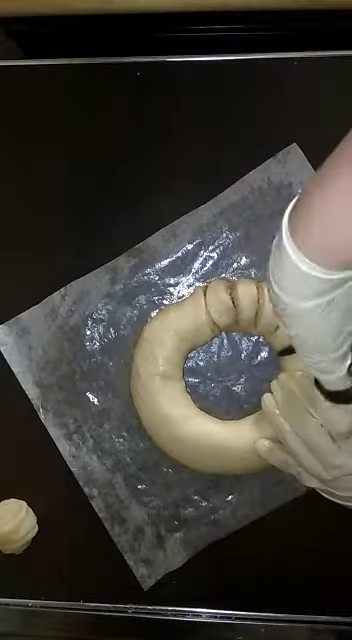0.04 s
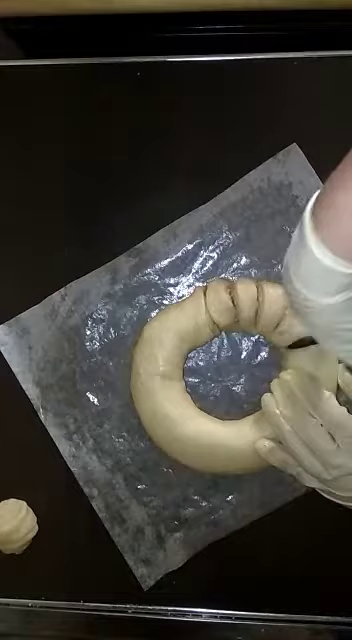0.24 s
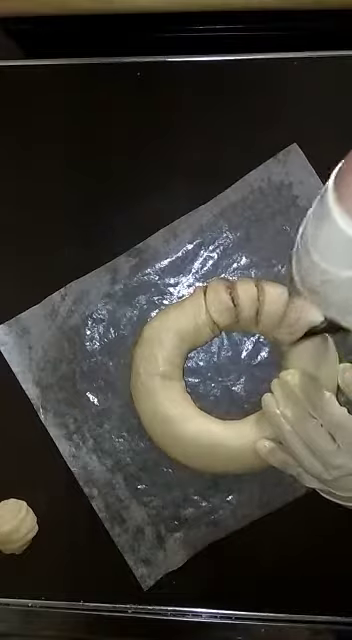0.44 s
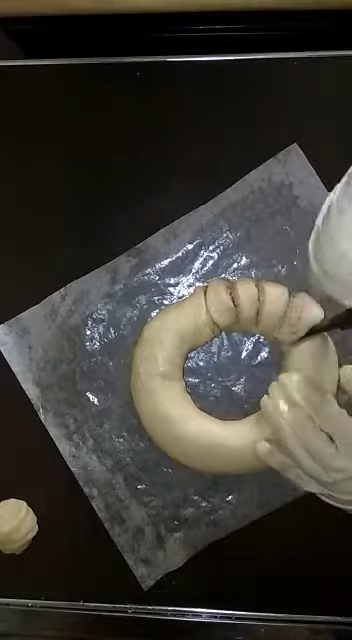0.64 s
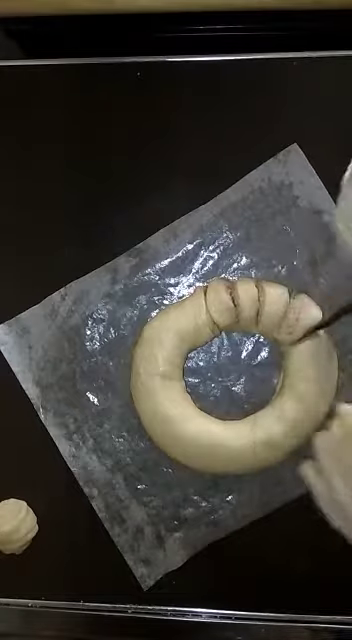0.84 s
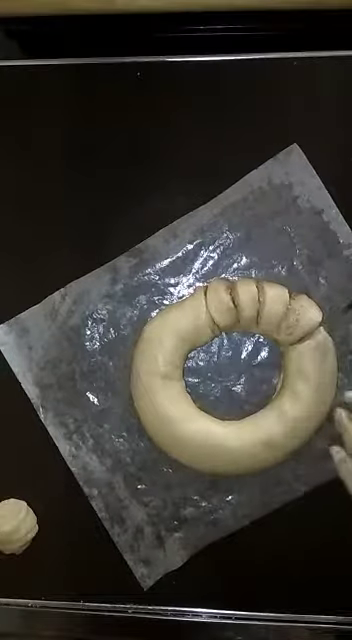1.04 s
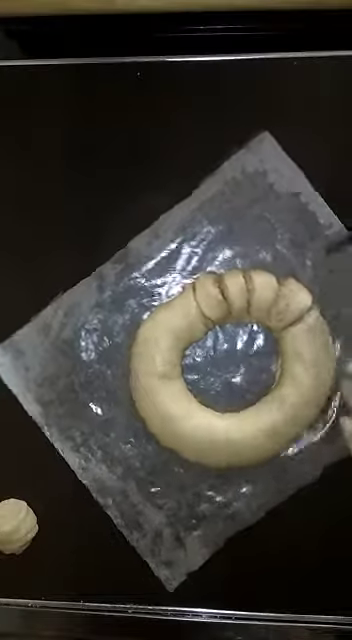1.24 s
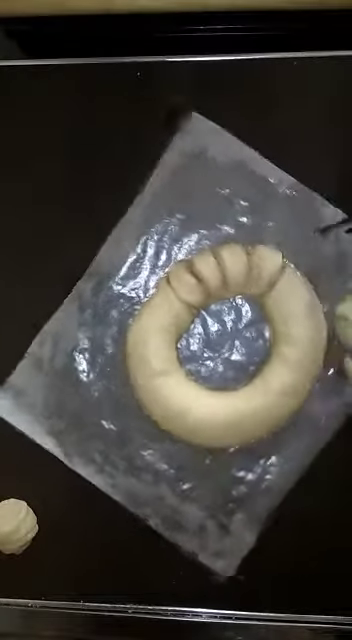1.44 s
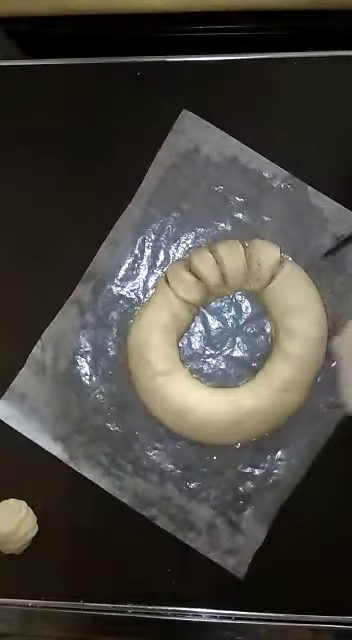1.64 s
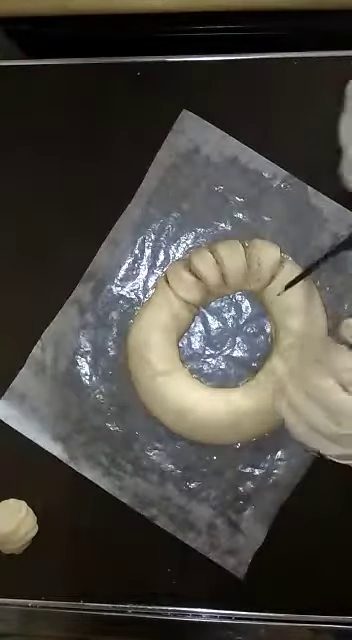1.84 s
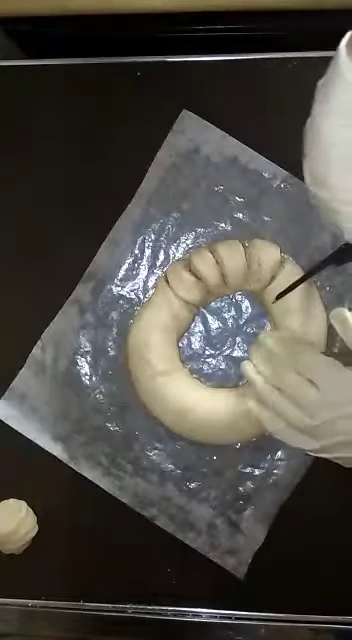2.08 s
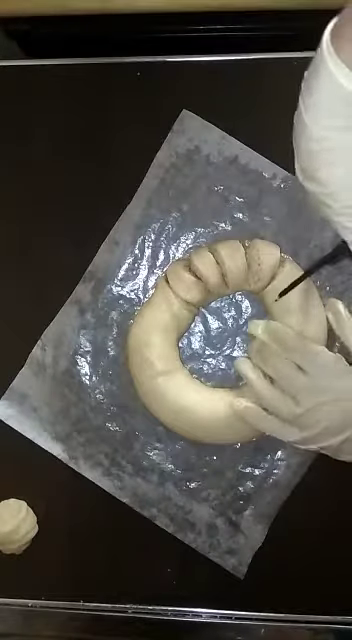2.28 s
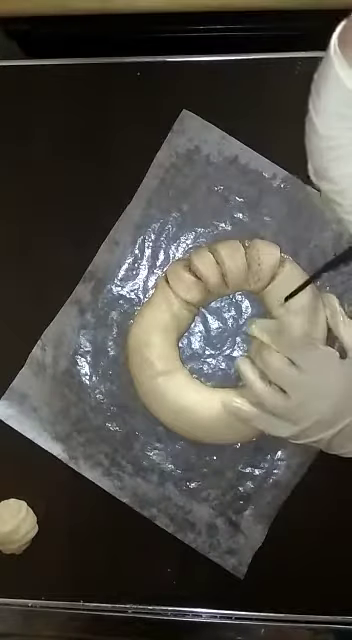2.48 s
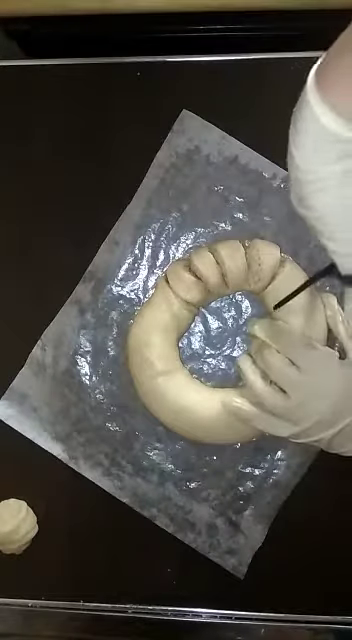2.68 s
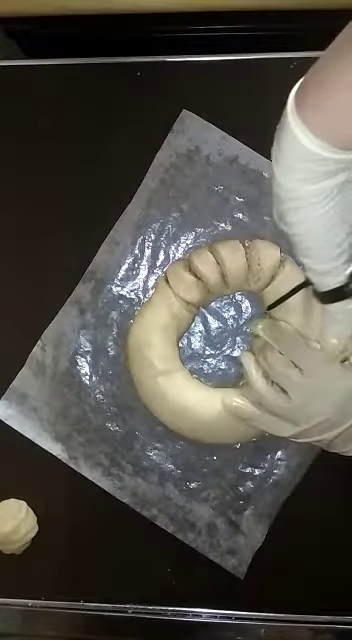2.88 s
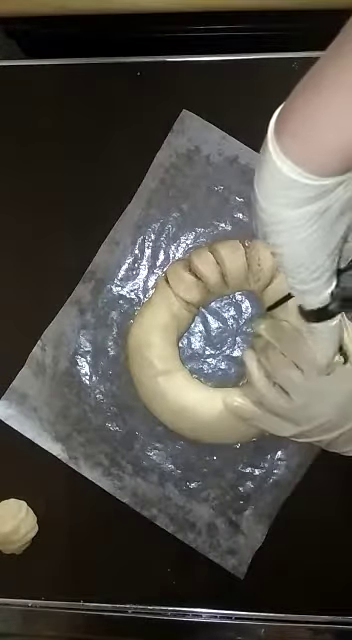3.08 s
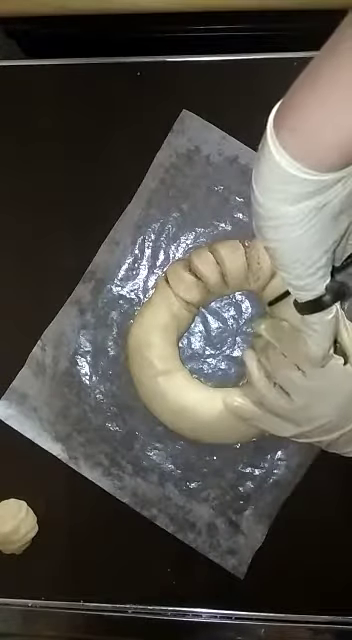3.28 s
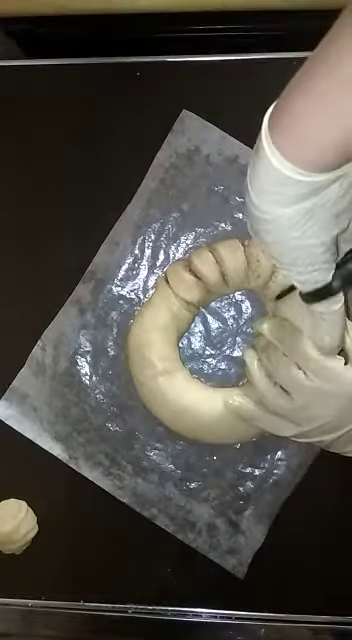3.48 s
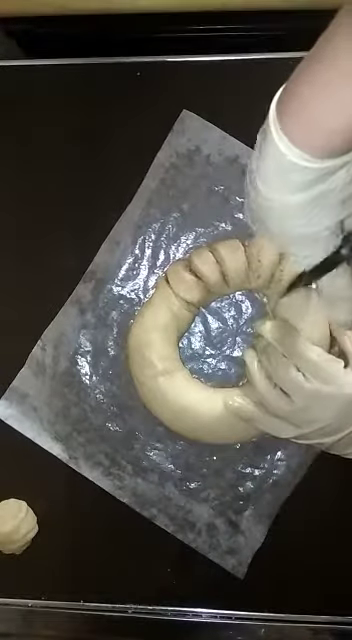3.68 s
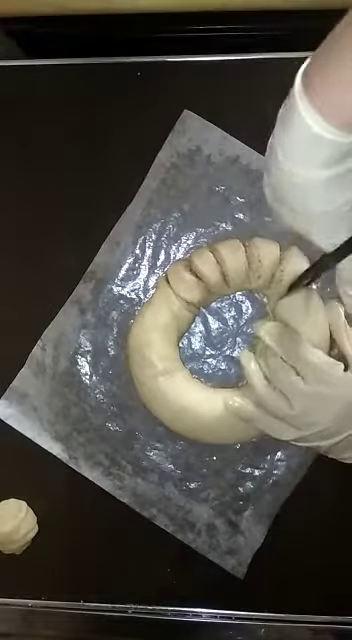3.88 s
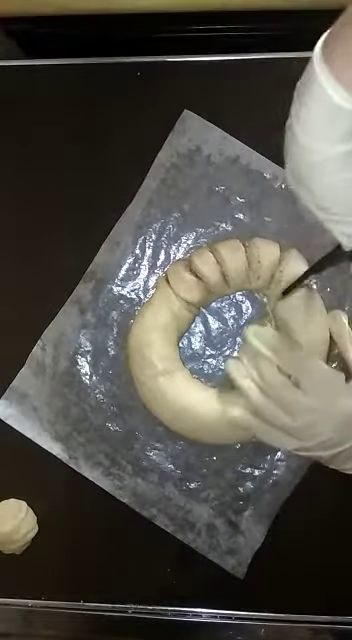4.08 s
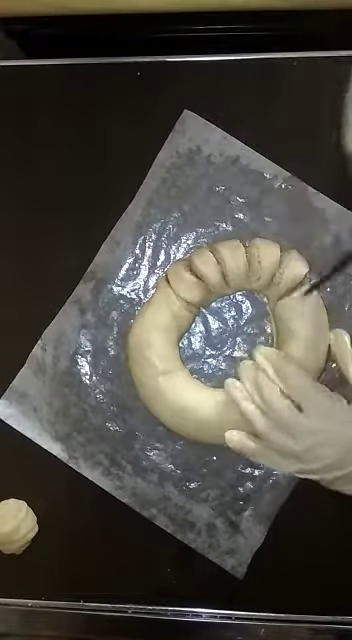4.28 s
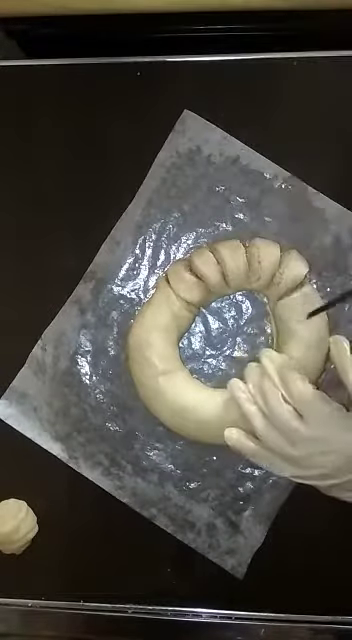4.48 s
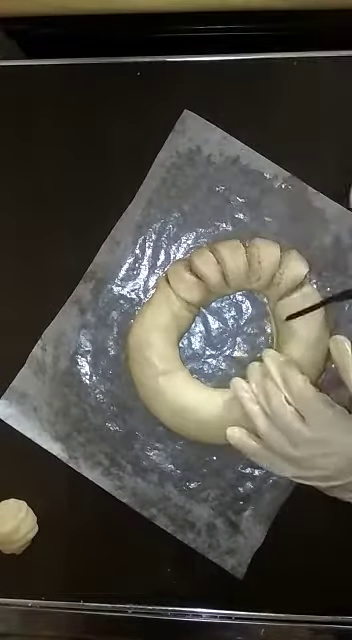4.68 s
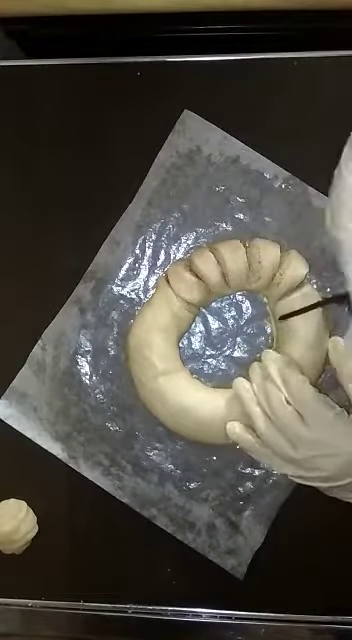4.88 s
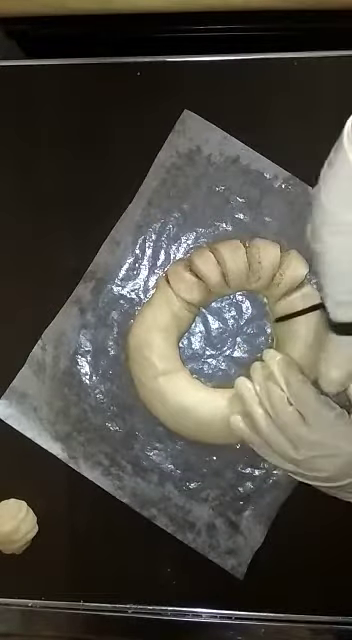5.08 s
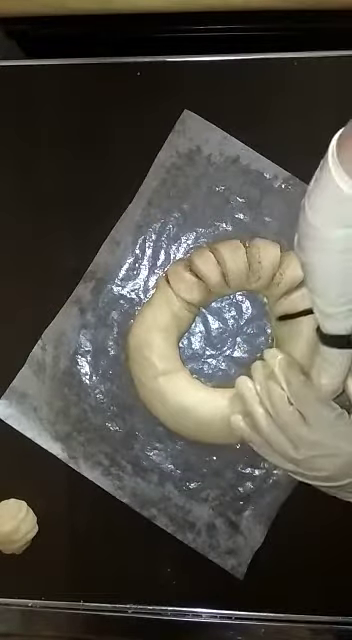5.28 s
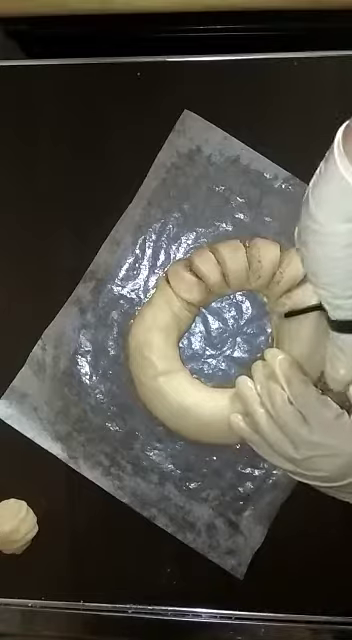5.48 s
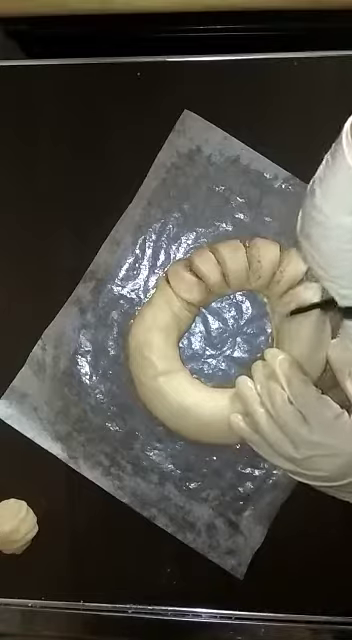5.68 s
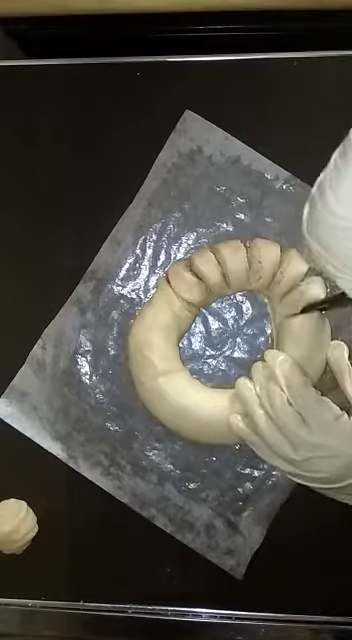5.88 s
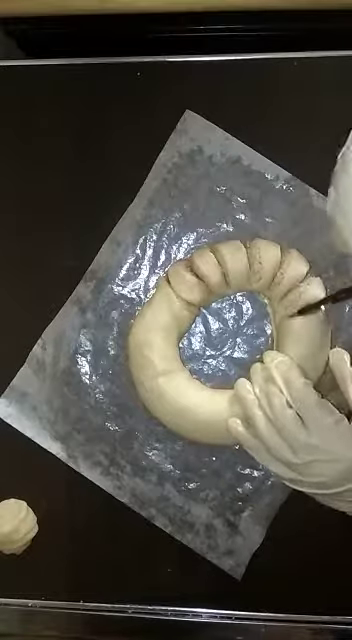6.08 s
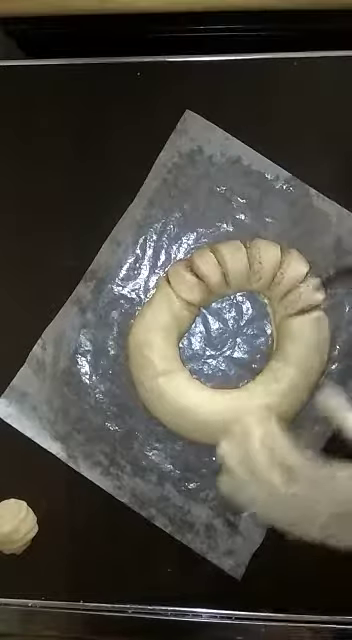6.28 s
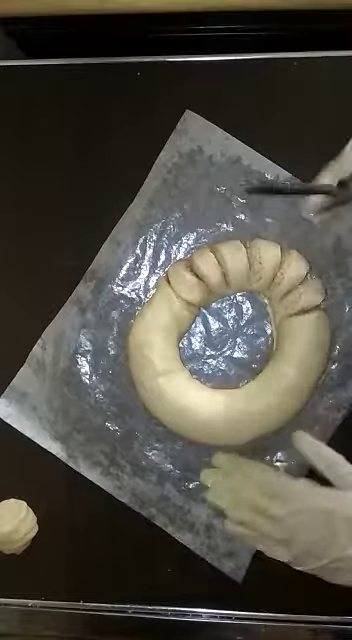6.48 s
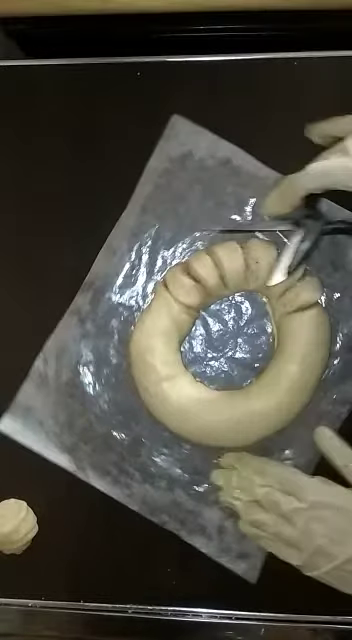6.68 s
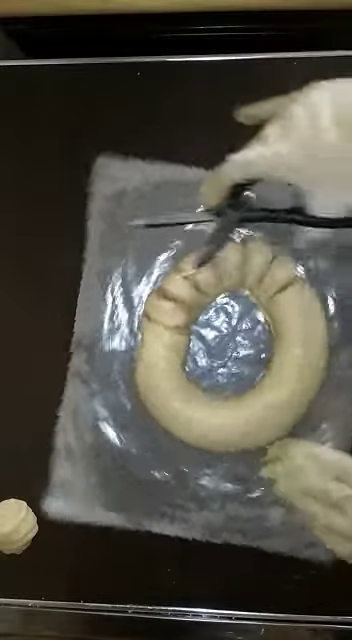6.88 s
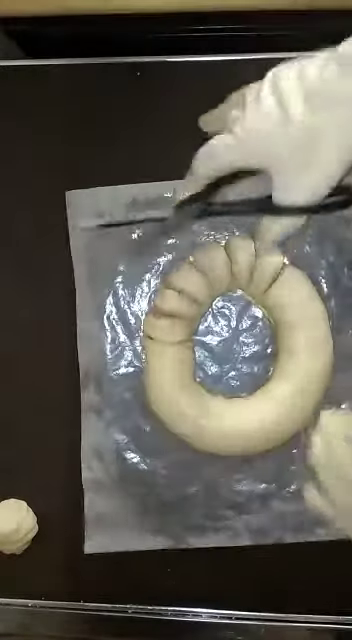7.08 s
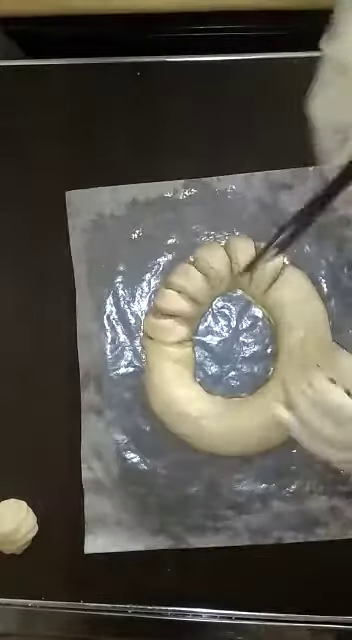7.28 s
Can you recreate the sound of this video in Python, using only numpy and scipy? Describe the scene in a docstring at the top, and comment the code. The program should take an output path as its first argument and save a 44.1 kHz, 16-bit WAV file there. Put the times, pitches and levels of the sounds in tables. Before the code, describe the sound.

In a quiet indoor room with a faint low appliance hum, scissors snap shut with a hard metallic tick and a dull thud on the worktop. Baking paper is then dragged round with bright crackling and swishing. Two more snips follow at intervals among soft glove rubbing and faint knocks, then another paper drag ends in a sharp snap. Close stereo microphones above, with a short room echo.

```python
"""Kitchen scissors snip a ring of dough on baking paper: hard ticks ring the steel's resonances.
Thuds, faint low knocks and leaning hands sound as modes of the hard worktop beneath. Between snips gloved
hands drag the paper round: gritty noise makes the hiss, short snaps, slower rubbing swells and dull bursts,
and gliding tones the squeaks. An appliance hums as tones and narrow noise bands in a quiet room with air
noise and a short diffuse echo; two microphone ports hear it from above."""
import sys
import numpy as np
from scipy import signal
from scipy.fft import rfft, irfft
from scipy.io import wavfile
from scipy.ndimage import uniform_filter1d

SR = 44100
rng = np.random.default_rng(int(sys.argv[2]) if len(sys.argv) > 2 else 0)


def pcm_store(signal):
    """Save signal as 16-bit PCM."""
    levels = np.round(np.clip(np.atleast_2d(signal), -1, 1) * 32767)
    wavfile.write(sys.argv[1], SR, levels.astype(np.int16).T)


N = 323253  # length in samples

# room air and microphone hiss, relative spectrum: f/Hz, level/dB
AIR_SPECTRUM = [(8, -2.5), (30, -7.5), (50, -3), (75, -33), (125, -10.5), (185, -11), (230, -32),
                (310, -17.5), (420, -23), (660, -29.5), (950, -39.5), (3000, -50.5), (6900, -50.5),
                (11000, -36.5), (16000, -50.5)]
AIR_DB = -58  # rms
# likeness of the steady sound in the two ports, clipped to -1..1: f/Hz, correlation/1
STEADY_LIKENESS = [(60, 0.91), (250, 0.86), (640, -0.017), (1400, -1.2), (3000, -1.1), (6000, 0.015)]
# appliance tones: f/Hz, width of each of two resonances/Hz, noise level/dB, steady level/dB (both rms)
HUM_TONES = [(49.4, 3.3, -63.5, -60), (98.7, 2.2, -71, -82), (149.5, 4, -76.5, -69.5),
             (173.7, 2.7, -65.5, -65), (343.5, 18.2, -69, -102), (755, 3.3, -84.5, -93.5),
             (1062.5, 46, -80, -99), (8870, 100, -83, -99)]
FAN_HZ, FAN_DB, FAN_WANDER_HZ = 343.7, -71, 3.5  # mean pitch, rms level, rms pitch wander
SWAY_DB = -52.5  # rms of the slow pressure sway near 10 Hz
# reverberation of the room: f/Hz, t60/s
ROOM_DECAY = [(300, 0.56), (2000, 0.27), (8000, 0.22), (15000, 0.24)]
# likeness of worktop sounds in the two ports, clipped to -0.9..1: f/Hz, correlation/1
NEAR_LIKENESS = [(250, 0.9), (500, 0.41), (1000, 0.057), (2500, 0.17), (6000, 0)]

# gloved hands moving over dough and paper: t/s, hiss level before colouring/dB
GLOVE_RUBBING = [(0, -84.5), (.16, -70.5), (.33, -99), (.48, -61), (.65, -74), (.75, -64.5), (.95, -66.5),
                 (1.7, -65), (2.02, -73), (2.16, -66.5), (2.5, -71), (2.65, -76.5), (3.5, -75),
                 (3.78, -62.5), (3.9, -73.5), (4.05, -63), (4.22, -70.5), (4.45, -73.5), (4.55, -75),
                 (5.3, -75.5), (5.35, -65.5), (5.4, -63), (5.46, -71), (5.51, -72), (5.54, -75),
                 (5.76, -71), (5.92, -65.5), (6.04, -74), (6.11, -62), (6.27, -73), (7.33, -65.5)]
# the sheet dragged round, one list for each of two drags: t/s, hiss level before colouring/dB
SHEET_SLIDES = [
    [(1.06, -67), (1.1, -53), (1.17, -55), (1.22, -43.5), (1.35, -39), (1.42, -36), (1.53, -39.5),
     (1.6, -47), (1.64, -58.5), (1.72, -91)],
    [(6.3, -73), (6.38, -66), (6.48, -59.5), (6.53, -47), (6.63, -55.5), (6.7, -58), (6.74, -38.5),
     (6.84, -40.5), (6.88, -39), (6.97, -36), (7.05, -43), (7.09, -47.5), (7.15, -61.5), (7.24, -66)],
]
# rubbing at QUIET_DB has this tilt (dB per octave); each dB above it brightens the hiss
QUIET_DB, QUIET_TILT_DB, TILT_PER_DB = -64, -2.5, 0.1775
# dull mid-range noise bursts, scuffs and the body of thuds: t/s, rms level at full swell/dB, rise/s, t60/s
DULL_BURSTS = [(.515, -39.5, 0.0011, 0.13), (0.837, -52.5, 0.027, 0.2), (3.734, -34.5, 0.0026, 0.058),
               (5.226, -66, 0.0048, .15), (5.813, -36.5, 0.0013, 0.015), (4.88, -58.5, 0.023, 0.16),
               (5.39, -58, 0.049, 0.29), (6.501, -61, 0.013, 0.65), (6.8, -61, 0.084, 0.4),
               (1.125, -52, 0.0049, .08), (1.4, -65, 0.027, 0.22), (1.51, -55.5, 0.013, 0.19),
               (6.93, -56.5, 0.039, 0.24)]
# relative spectrum of the dull bursts: f/Hz, level/dB
DULL_SPECTRUM = [(150, 7), (300, 4.5), (700, 11.5), (1100, -0.5), (1600, 2), (2500, -6), (4000, -15),
                 (8000, -19)]
# faint glove squeaks: t/s, length/s, starting f/Hz, final f/Hz, peak level before the ports/dB
GLOVE_SQUEAKS = [(0.264, 0.023, 1850, 1720, -67.5), (1.597, .005, 6160, 6100, -41),
                 (1.625, .005, 6160, 6050, -53), (1.655, 0.004, 6040, 5970, -47),
                 (1.952, 0.049, 2360, 2560, -69), (3.566, 0.014, 1500, 1600, -67),
                 (3.663, 0.028, 1350, 1500, -69)]
# relative spectrum of the paper noise: f/Hz, level/dB
PAPER_SPECTRUM = [(530, -48), (900, -51), (1340, -17.5), (1460, -17.5), (2250, -9.5), (3380, -8.5),
                  (4100, -5), (4600, -7.5), (4950, -9), (5300, -7), (5890, -4), (6500, -6.5), (6850, -10),
                  (7300, -5.5), (9000, -5), (11000, -0.5), (12500, -2.5), (14400, -11.5), (16000, -19.5)]
# short paper and glove sounds, sharp snaps and slower rubbing swells:
# t/s, peak level before the ports/dB, rise/s, t60/s, tilt/(dB per octave)
SNAPS_AND_SWELLS = [(.550, -40.5, 0.0033, 0.055, -1), (0.725, -49, 0.017, 0.12, -4),
                    (1.113, -30, 0.0015, 0.076, -1), (1.118, -22.5, 0.018, 0.045, 0.5),
                    (1.179, -29.5, 0.0038, 0.039, 1), (1.205, -32, .005, 0.085, 3),
                    (1.211, -31, 0.0054, 0.086, 1.5), (1.321, -21, 0.0016, 0.039, 1),
                    (1.364, -31, 0.0036, 0.043, -5), (1.4109, -14.5, 0.0016, 0.05, -0.7),
                    (1.417, -25, 0.0051, 0.13, -2.5), (1.513, -19, .0015, 0.023, 1.5),
                    (1.517, -19, .003, 0.039, 0), (1.568, -35, .0022, 0.035, -3),
                    (1.586, -27.5, 0.0023, 0.054, -0.5), (1.599, -27.5, 0.0026, 0.029, 16),
                    (1.651, -45.5, .0018, .04, -5), (2.164, -51.5, 0.0085, 0.14, -5),
                    (3.02, -51, 0.009, 0.12, 9), (3.38, -50.5, .0028, 0.041, 11),
                    (3.648, -48, 0.015, 0.48, 6), (5.167, -55, 0.0012, 0.027, -8.5),
                    (5.209, -44, 0.0039, .06, -1.5), (5.221, -43, .0042, 0.07, 0),
                    (5.364, -34.5, 0.004, 0.03, 2), (5.3794, -27.5, 0.0016, 0.045, 1),
                    (5.393, -40, .002, 0.027, -1.5), (5.429, -28, 0.0036, 0.03, 1.5),
                    (5.47, -31.5, 0.0015, 0.046, 0), (5.8113, -33, 0.0024, 0.037, 5),
                    (6.088, -39.5, 0.0011, 0.028, -7), (6.193, -48.5, 0.01, 0.15, -5),
                    (6.498, -32.5, 0.0014, 0.053, -5), (6.525, -36.5, 0.002, 0.084, -15.5),
                    (6.529, -26, 0.0027, 0.059, 4.5), (6.559, -38, 0.0034, 0.056, -8.5),
                    (6.585, -41, .003, .04, -10), (6.630, -33, 0.0013, 0.041, -0.5),
                    (6.645, -46.5, 0.0015, 0.026, -17), (6.718, -24, 0.0079, 0.13, 4),
                    (6.722, -18.5, 0.024, 0.042, 2.5), (6.859, -38, 0.0036, 0.085, -3.5),
                    (7.0624, -11, 0.0018, 0.021, 2.5), (7.067, -21, 0.0022, .04, 6),
                    (7.077, -28, .002, .03, 10)]

# hands leaning on the dough, a rumble in the slab: start t/s, length/s, level before the high-pass/dB
HAND_LEANS = [(0.104, 0.29, -56.5), (1.374, 0.25, -68), (3.433, 0.29, -64), (5.375, 0.17, -54.5),
              (6.497, 0.074, -70), (6.737, 0.42, -57)]
# worktop mode pitches: f/Hz
MODE_HZ = [121, 153, 181, 204, 306, 349, 387, 430, 467, 560, 596, 617, 701, 795, 915, 1230, 1400]
# the same modes in order: relative level/dB, t60/s (thuds and knocks use at most 0.4 s)
MODE_RING = [(-6, 0.5), (-12, 0.1), (-4.5, 0.12), (1, 0.052), (-23, 0.067), (-5.5, 0.25), (3.5, 0.11),
             (-5, 0.018), (-13, 0.14), (-3.5, 0.038), (-9.5, 0.088), (-1, 0.14), (-5.5, 0.18), (-20, 0.1),
             (-26, 0.041), (-17, 0.04), (-21, 0.01)]
MIDDLE_HZ, UPPER_HZ = 250, 520  # where the middle and upper modes begin
# thuds and faint low knocks: t/s, peak ring level before the high-pass/dB, pulse length/s,
# first swing/(+1 or -1), middle modes' level/dB, upper modes' level/dB
THUDS_AND_KNOCKS = [(0.5164, -17, 0.0044, 1, -1.5, -1.5), (0.861, -42, 0.014, -1, -2, 0),
                    (1.124, -47, 0.0035, -1, -9, -4), (1.17, -44, 0.0083, -1, -5, -3),
                    (1.385, -52, 0.0028, -1, 3, 7), (1.403, -42, 0.0026, -1, 0, 5),
                    (1.429, -45.5, 0.0042, -1, 0, -9), (1.467, -52, 0.0022, -1, -3, 9),
                    (1.497, -53, 0.0027, -1, 0, 5), (1.519, -54, 0.0023, -1, -4, 2),
                    (2.356, -52, 0.0076, -1, -12, 0), (3.474, -43.5, 0.0036, -1, 3, 1),
                    (3.516, -55, 0.0028, -1, -2, -2), (3.56, -55, 0.0057, -1, -2, 2),
                    (3.585, -42.5, 0.0058, -1, -3, 4), (3.673, -42, 0.0056, -1, 6, 6),
                    (3.725, -38.5, 0.004, 1, 2, 0), (3.7335, -22.5, 0.004, -1, -5, 0),
                    (4.887, -51, 0.0051, -1, -3, 3), (5.2250, -28.5, 0.0039, -1, 0, 2),
                    (5.26, -40, 0.0024, 1, -7, 7), (5.412, -39.5, 0.0042, -1, 2, -6),
                    (5.441, -39, 0.0034, -1, -1, -2), (5.817, -30.5, 0.0055, -1, -1, -9),
                    (6.711, -40.5, 0.0079, -1, -5, -8), (6.865, -57, .003, -1, 4, 2),
                    (6.94, -47, 0.0031, -1, 5, 0), (6.987, -50, 0.0033, -1, -1, -1)]
HARD_TILT_DB, TILT_DB_PER_MS = 7.5, -1.1  # dB per octave at zero length; longer pulses tilt downwards
RATTLE_DB = -13  # peak, against the peak of the ring
REST_DRAG_DB, DRAG_PER_DB = -73.5, 0.2619  # slab drag at QUIET_DB, and its rise per dB of rubbing

# blades shutting: t/s, click peak level/dB, t60 of the crushed-dough fizz/s, fizz level re click/dB
BLADE_SNIPS = [(.5133, -26, .03, -4), (3.7336, -24, .028, -6), (5.8150, -21, .032, -6)]
# steel resonances: f/Hz, width/Hz (at least 900 is used), relative level/dB
BLADE_MODES = [(1430, 840, -17), (3020, 14000, -26), (4350, 910, 0), (5530, 4050, 2), (7950, 420, 10),
               (10570, 480, 4.5), (13000, 400, -28)]
PORT_LAG = 6  # samples by which the left port hears the click late
EDGE_HZ = 15680  # upper band limit


def gain_of(db):
    """Level law: an amplitude factor is ten to the power of dB / 20."""
    return 10 ** (np.asarray(db) / 20)


def evened(x):
    """Normalisation: scales the mean power to 1."""
    return x / np.sqrt(np.mean(x ** 2) + 1e-20)


def read(points, hz):
    """Interpolation of a table along a logarithmic frequency axis."""
    f, value = np.transpose(points)
    return np.interp(np.log(hz + 1), np.log(f + 1), value)


def add(mix, s, sound):
    """Superposition: mixes a sound in at time s, in place."""
    part = mix[..., round(s * SR):][..., :sound.shape[-1]]
    part += sound[..., :part.shape[-1]]


def resonate(x, hz, width):
    """Damped resonance: one complex pole whose radius sets the bandwidth."""
    r = np.exp(-np.pi * width / SR)
    return 2 * signal.lfilter([1 - r], [1, -r * np.exp(2j * np.pi * hz / SR)], x).real


def resonate_twice(x, hz, width):
    """Cascaded resonance: a second equal pole steepens the skirts."""
    return resonate(resonate(x, hz, width), hz, width)


def narrow_noise(hz, width):
    """Narrow-band noise of rms 1; the first second, where the resonator builds up, is dropped."""
    return evened(resonate_twice(rng.standard_normal(N + SR), hz, width)[SR:])


def patchwork(shape, bins, frames):
    """Correlated random field: noise averaged over neighbouring frequency bins and time frames."""
    field = uniform_filter1d(rng.standard_normal(shape), size=bins, axis=0)
    return evened(uniform_filter1d(field, size=frames, axis=1))


def alike(same, a, b):
    """Partial coherence: two channels of the given correlation from independent noises a and b."""
    return np.array([a, same * a + np.sqrt(1 - same ** 2) * b])


def colour(x, points, tilt_db=0):
    """Spectral shaping by a table tilted about 6 kHz, with the rms conserved."""
    hz = np.fft.rfftfreq(x.shape[-1], 1 / SR)
    tilt = tilt_db * np.log2(np.clip(hz, 500, SR) / 6000)
    y = irfft(rfft(x) * gain_of(read(points, hz) + tilt), x.shape[-1])
    return evened(y) * np.sqrt(np.mean(x ** 2))


def grit(size, per_s, spread_db, smooth):
    """Impulsive modulation: two-channel noise whose strength jumps with uneven slips over a smooth bed."""
    strengths = gain_of(spread_db * np.minimum(rng.exponential(1, size), 4))
    slips = strengths * (rng.random(size) < per_s / SR)
    shape = signal.oaconvolve(slips, np.exp(-np.arange(300) / 45))[:size]  # decay constant of 45 samples
    return evened((smooth + evened(shape)) * rng.standard_normal((2, size)))


def swell(t, rise, t60):
    """Transient envelope: a smooth rise, then an exponential fall."""
    rise = max(rise, 1e-4)
    fall = gain_of(-60 * (t - rise) / max(t60, .003))
    return np.where(t < rise, np.sin(np.pi / 2 * t / rise) ** 2, fall)


def air():
    """Diffuse-field noise: patchy and broad, strongly alike in both ports only in the bass."""
    frames, hz = N // 512 + 5, np.fft.rfftfreq(2048, 1 / SR)
    a, b, c, d = rng.standard_normal((4, len(hz), frames))
    patches = patchwork((len(hz), frames), bins=20, frames=8)
    same = np.clip(read(STEADY_LIKENESS, hz), -1, 1)[:, None]
    z = alike(same, a + 1j * b, c + 1j * d)
    z *= gain_of(read(AIR_SPECTRUM, hz)[:, None] + 0.25 * patches)
    return gain_of(AIR_DB) * evened(signal.istft(z, nperseg=2048, noverlap=1536)[1][:, :N])


def appliance():
    """Beating: narrow noise makes steady tones waver; a wandering tone and a slow air sway are added."""
    out, t = np.zeros((2, N)), np.arange(N) / SR
    for hz, width, noise_db, steady_db in HUM_TONES:
        a, b = rng.standard_normal((2, N + SR))
        pair = alike(np.clip(read(STEADY_LIKENESS, hz), -1, 1), a, b)
        out += gain_of(noise_db) * evened(resonate_twice(pair, hz, width)[:, SR:])
        out += gain_of(steady_db) * np.sqrt(2) * np.sin(2 * np.pi * (hz * t + rng.random()))
    sway = narrow_noise(9.7, 1.67)
    wander = narrow_noise(0, 2)
    fan = np.sqrt(2) * np.sin(2 * np.pi * np.cumsum(FAN_HZ + FAN_WANDER_HZ * wander) / SR)
    return out + gain_of(SWAY_DB) * sway + gain_of(FAN_DB) * fan


def room(x):
    """Reverberation: sparse taps of random sign, each band decaying at its own rate, other taps per port."""
    taps = np.zeros((2, SR // 2))
    at = np.arange(120, SR // 2 - 20, 20)
    at = at + rng.integers(0, 20, (2, len(at)))
    np.put_along_axis(taps, at, rng.choice([-1., 1.], at.shape), 1)
    hz, t, z = signal.stft(taps, SR, nperseg=256)
    decay = gain_of(-60 * t / read(ROOM_DECAY, hz)[:, None])
    tail = signal.istft(z * decay, SR, nperseg=256)[1]
    return signal.fftconvolve(x, tail / np.linalg.norm(tail[0]), axes=1)[:, :N]


def ports(x):
    """Spatial coherence: mid and side weights give two unrelated channels the likeness of close ports."""
    same = np.clip(read(NEAR_LIKENESS, np.fft.rfftfreq(N, 1 / SR)), -.9, 1)
    mid = rfft(x[0] + x[1]) * np.sqrt(1 + same) / 2
    side = rfft(x[0] - x[1]) * np.sqrt(1 - same) / 2
    return irfft(np.array([mid + side, mid - side]), N)


def rubbing_db():
    """Energy summation: powers of the hands throughout and of the sliding sheet add up."""
    t = np.arange(N) / SR
    curves = [np.interp(t, *np.transpose(GLOVE_RUBBING))]
    curves += [np.interp(t, *np.transpose(slide), left=-120, right=-120) for slide in SHEET_SLIDES]
    return 10 * np.log10(sum(gain_of(2 * db) for db in curves))


def dull_bursts():
    """Spectral shaping: gritty noise bursts, dull and mid-range, for scuffs and the body of thuds."""
    out, t = np.zeros((2, N)), np.arange(SR // 2) / SR
    for s, db, rise, t60 in DULL_BURSTS:
        burst = colour(grit(len(t), per_s=600, spread_db=1.5, smooth=1.2), DULL_SPECTRUM)
        add(out, s, gain_of(db) * swell(t, rise, t60) * burst)
    return out


def squeaks():
    """Frictional oscillation: short gliding tones, their pitch roughened by uneven slip."""
    out = np.zeros(N)
    for s, length, from_hz, to_hz, db in GLOVE_SQUEAKS:
        size = round(length * SR)
        uneven = evened(uniform_filter1d(rng.standard_normal(size), size=60))
        hz = np.linspace(from_hz, to_hz, size) * (1 + 0.05 * uneven)
        add(out, s, gain_of(db) * np.hanning(size) * np.sin(2 * np.pi * np.cumsum(hz) / SR))
    return out


def rustle():
    """Friction noise: dense, brighter with level, with random narrow bands varying in strength."""
    db = rubbing_db()
    slips = grit(N, per_s=1500, spread_db=2.8, smooth=1.2)
    hz, t, z = signal.stft(colour(slips, PAPER_SPECTRUM), SR, nperseg=256)
    narrow_bands = patchwork(z.shape[1:], bins=2, frames=24)
    flutter = patchwork(z.shape[1:], bins=25, frames=4)  # wide bands crackle up and down
    octaves = np.log2(np.clip(hz, 500, SR) / 8000)[:, None]
    frame_db = np.interp(t * SR, np.arange(N), db)
    tilt_db = QUIET_TILT_DB + TILT_PER_DB * (frame_db - QUIET_DB)  # louder rubbing is brighter
    shading = gain_of(octaves * tilt_db + 2.48 * narrow_bands + 0.9 * flutter)
    return gain_of(db) * signal.istft(z * shading, SR, nperseg=256)[1][:, :N]


def snaps_and_swells():
    """Transient noise: short paper and glove sounds, sharp or slowly swelling, each randomly coloured."""
    out, t = np.zeros((2, N)), np.arange(8192) / SR
    for s, db, rise, t60, tilt_db in SNAPS_AND_SWELLS:
        own_colour = np.transpose([np.geomspace(1000, 16000, num=16), 1.5 * rng.standard_normal(16)])
        slips = grit(len(t), per_s=1200, spread_db=2.5, smooth=1.8)
        burst = colour(colour(slips, PAPER_SPECTRUM, tilt_db), own_colour)
        burst = burst * swell(t, rise, t60)
        add(out, s, gain_of(db) * burst / abs(burst).max())
    return out


def leaning(rumble):
    """Forced vibration: leaning hands shake the lower modes in uneven lumps."""
    weight = np.zeros(N)
    for s, length, db in HAND_LEANS:
        add(weight, s, gain_of(db) * np.hanning(round(length * SR)) ** 0.59)
    lumps = gain_of(2.5 * narrow_noise(0, 30))
    return weight * evened(lumps * resonate_twice(rumble, 225, 270))


def thud_or_knock(t, length, swing, middle_db, upper_db):
    """Modal excitation: a soft pulse rings the slab's modes, their balance differing each time."""
    tilt_db = HARD_TILT_DB + TILT_DB_PER_MS * length * 1000
    balance_db = 1.5 * rng.standard_normal(len(MODE_HZ))
    group = np.searchsorted([MIDDLE_HZ, UPPER_HZ], MODE_HZ)  # 0 lower, 1 middle, 2 upper
    balance_db = balance_db + np.array([0, middle_db, upper_db])[group]
    modes = np.zeros(len(t))
    for f, (db, t60), offset_db in zip(MODE_HZ, MODE_RING, balance_db):
        level_db = db + offset_db + tilt_db * np.log2(f / 200) - 60 * t / min(t60, .4)
        modes += gain_of(level_db) * np.sin(2 * np.pi * f * t)
    # the pulse swings one way, then back; a longer one is duller
    pulse = np.sign(swing) * np.diff(np.hanning(max(round(length * SR), 8)))
    rattle = rng.standard_normal(len(t)) * gain_of(-60 * t / 0.14)  # noise keeps nudging the modes
    ring = signal.oaconvolve(modes, pulse)[:len(t)]
    after = signal.oaconvolve(modes, uniform_filter1d(rattle, size=12))[:len(t)]
    ring = ring * (0.34 + 0.66 * np.exp(-(t / 0.019) ** 2))  # the ring soon drops to a third
    return ring / abs(ring).max() + gain_of(RATTLE_DB) * after / abs(after).max()


def worktop():
    """Plate vibration: thuds, faint knocks, paper drag and leaning hands sound through the slab's modes."""
    out, t = np.zeros(N), np.arange(16384) / SR
    for s, db, length, swing, middle_db, upper_db in THUDS_AND_KNOCKS:
        add(out, s, gain_of(db) * thud_or_knock(t, length, swing, middle_db, upper_db))
    drive, rumble = rng.standard_normal(N), np.zeros(N)
    for f, (db, t60) in zip(MODE_HZ, MODE_RING):
        rumble += gain_of(db + 2.3 * np.log2(f / 200)) * evened(resonate(drive, f, 6.4 / t60 + 8))
    drag_db = REST_DRAG_DB + DRAG_PER_DB * (rubbing_db() - QUIET_DB)
    out += gain_of(drag_db) * evened(rumble) + leaning(rumble)
    # the slab radiates little below its lowest mode
    return signal.sosfilt(signal.butter(6, 106, "high", fs=SR, output="sos"), out)


def snips():
    """Impact excitation: tips and handles meet in hard ticks that ring the steel; squeezed dough fizzes."""
    out, t = np.zeros((2, N)), np.arange(4096) / SR
    for s, db, t60, fizz_db in BLADE_SNIPS:
        ticks = np.zeros(len(t))
        ticks[[0, 20, 45, 66]] = np.array([1, .7, .8, .4]) * rng.uniform(.7, 1.1, 4)
        noise = grit(len(t), per_s=1500, spread_db=2.0, smooth=2.2)
        click, fizz = np.zeros(len(t)), 0.17 * colour(noise, PAPER_SPECTRUM, -9.0)
        for k, (f, width, mode_db) in enumerate(BLADE_MODES):
            width = max(width, 900)
            click += (-1) ** k * gain_of(mode_db) * resonate(ticks, f, width)  # neighbours in opposite phase
            fizz += gain_of(mode_db) * resonate(noise, f, width)
        click = np.array([np.roll(click, PORT_LAG), click]) / abs(click).max()
        add(out, s, gain_of(db) * (click + gain_of(fizz_db - 60 * t / t60) * evened(fizz)))
    return out


def scene():
    """Superposition of the close sounds, their echo and the room's steady sound."""
    steel, slab = snips(), worktop()
    hands = snaps_and_swells() + rustle() + dull_bursts() + squeaks()
    boom = gain_of(-13) * room(np.array([slab, slab]))
    echo = gain_of(-8) * room(steel + hands)
    return steel + slab + ports(hands + echo + boom) + air() + appliance()


def record(dry):
    """Band limitation: a linear-phase low-pass at EDGE_HZ."""
    low_pass = signal.firwin(511, EDGE_HZ, window=("kaiser", 9), fs=SR)
    return signal.oaconvolve(dry, low_pass[None], "same")


dry = scene()
out = record(dry)
pcm_store(out)
```